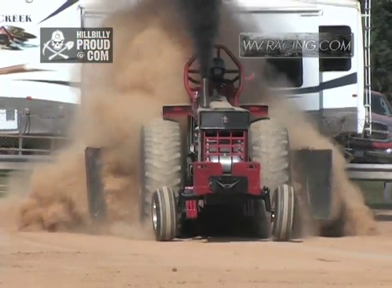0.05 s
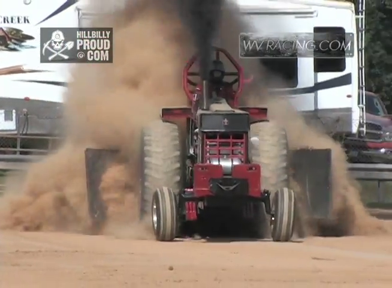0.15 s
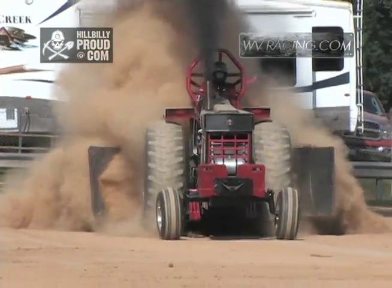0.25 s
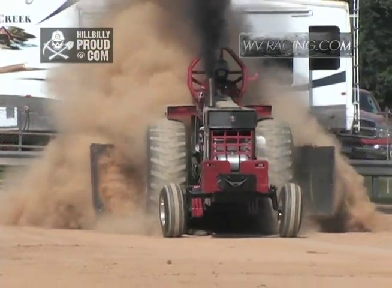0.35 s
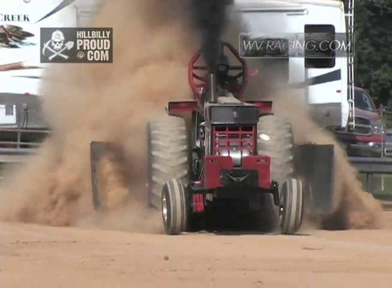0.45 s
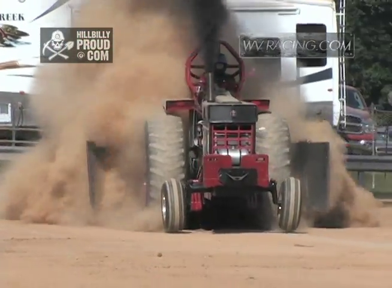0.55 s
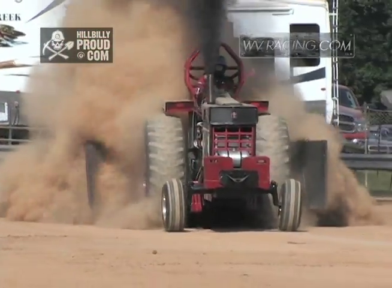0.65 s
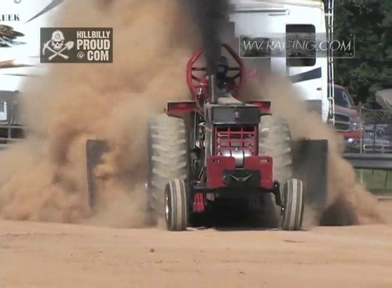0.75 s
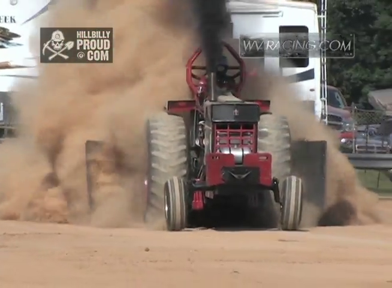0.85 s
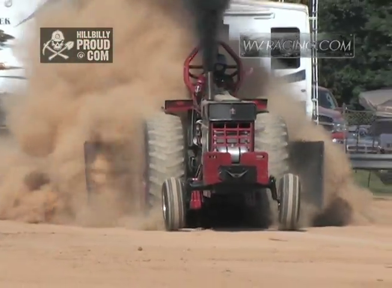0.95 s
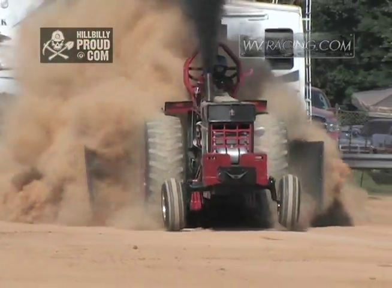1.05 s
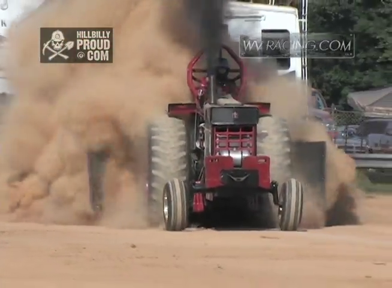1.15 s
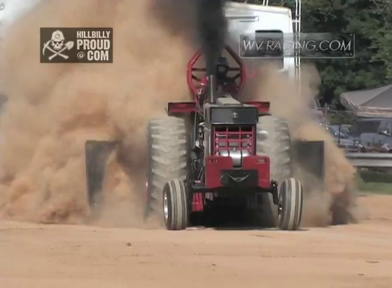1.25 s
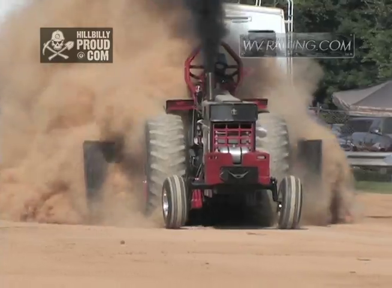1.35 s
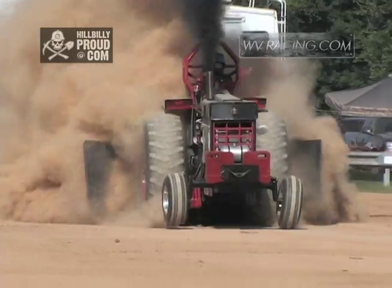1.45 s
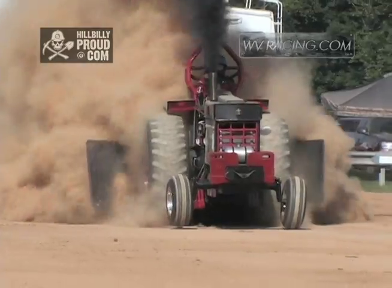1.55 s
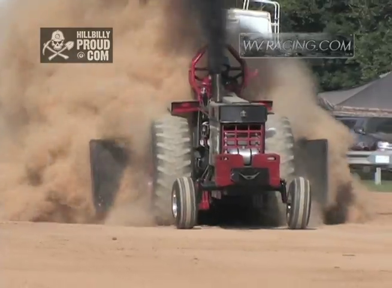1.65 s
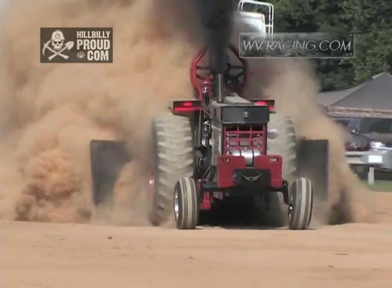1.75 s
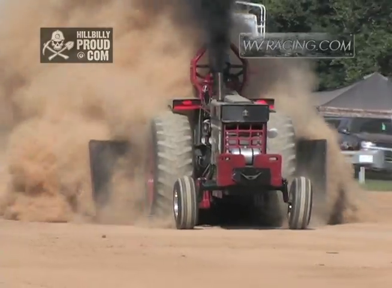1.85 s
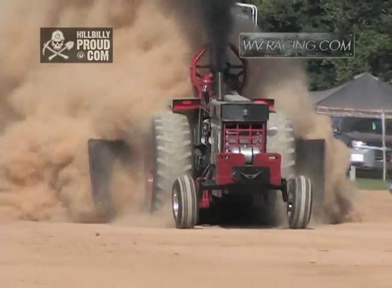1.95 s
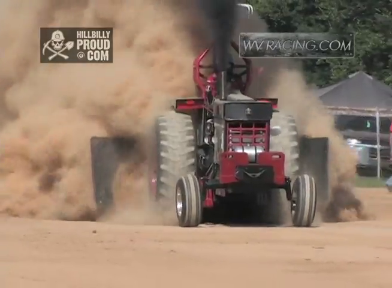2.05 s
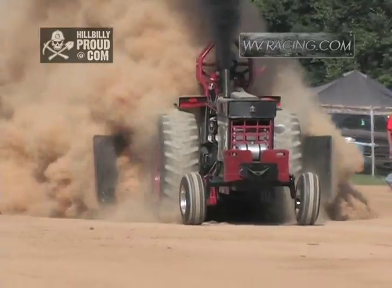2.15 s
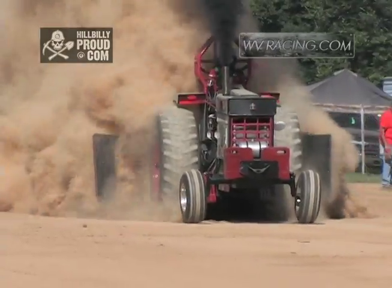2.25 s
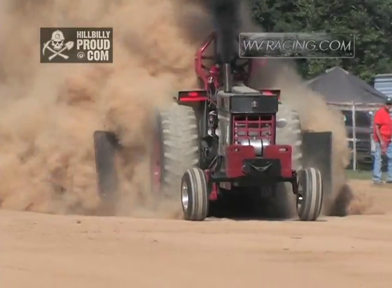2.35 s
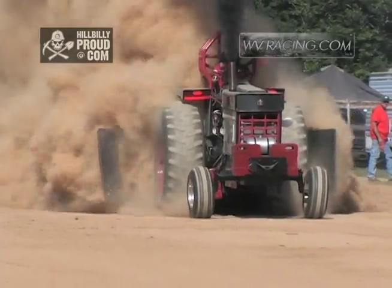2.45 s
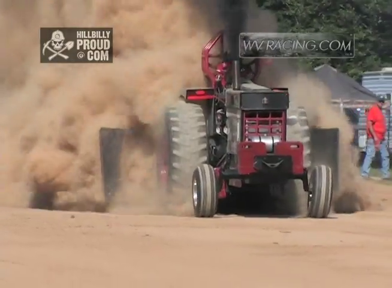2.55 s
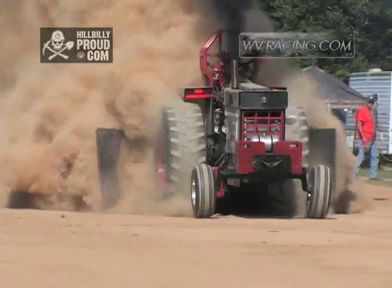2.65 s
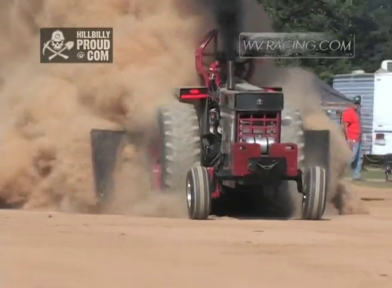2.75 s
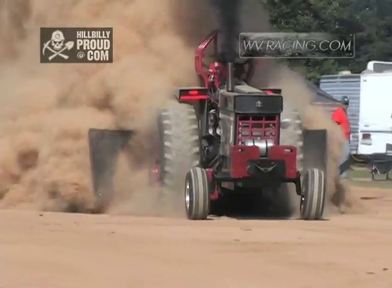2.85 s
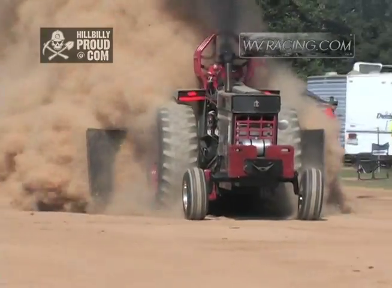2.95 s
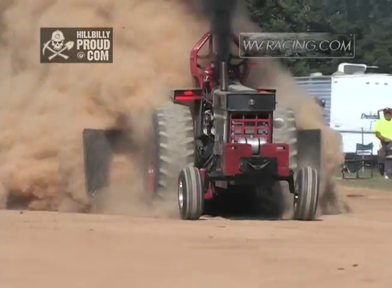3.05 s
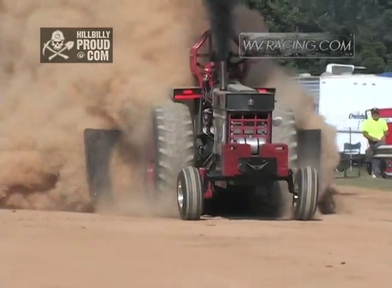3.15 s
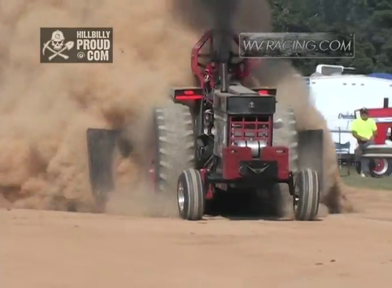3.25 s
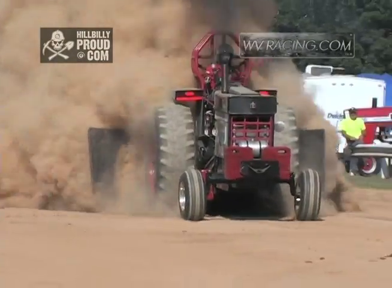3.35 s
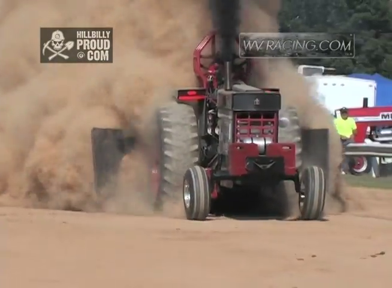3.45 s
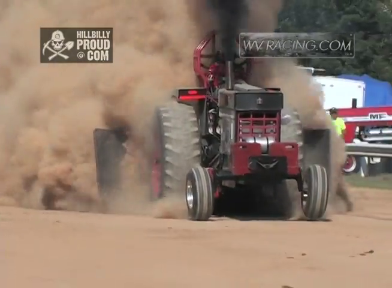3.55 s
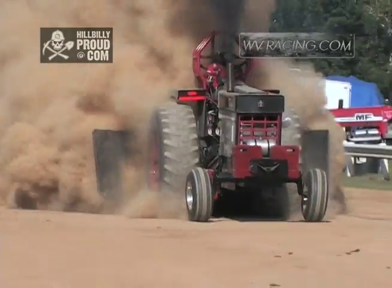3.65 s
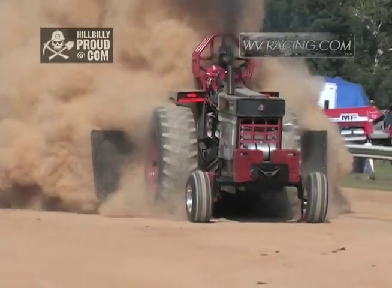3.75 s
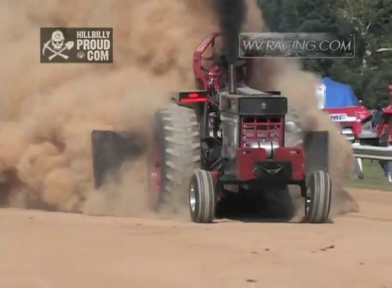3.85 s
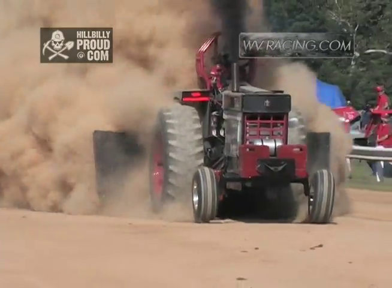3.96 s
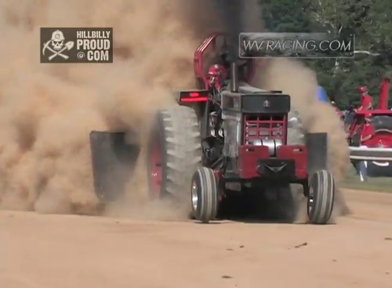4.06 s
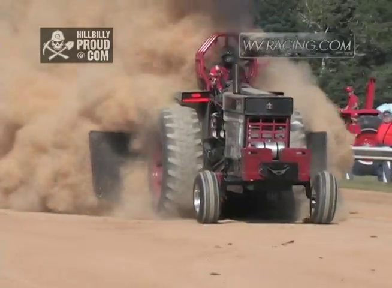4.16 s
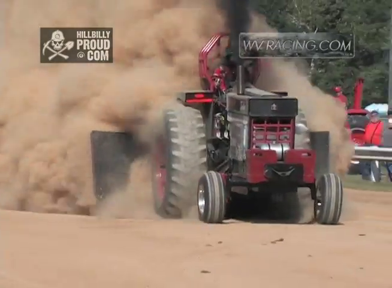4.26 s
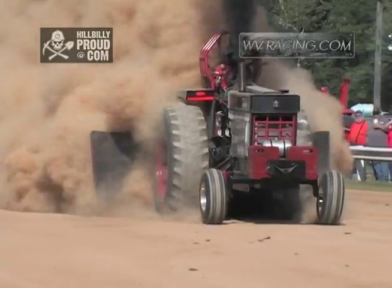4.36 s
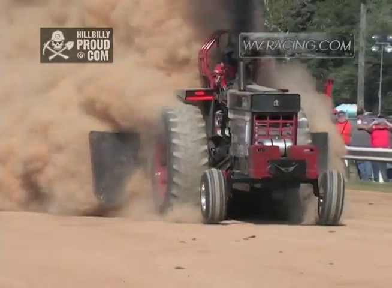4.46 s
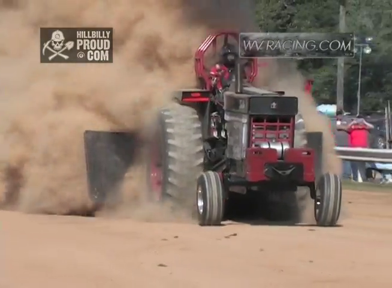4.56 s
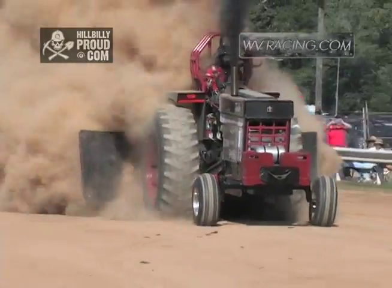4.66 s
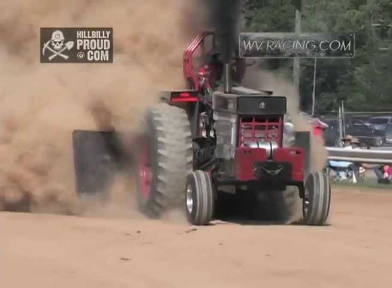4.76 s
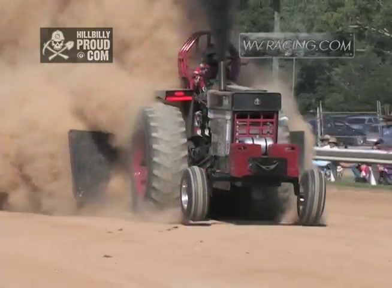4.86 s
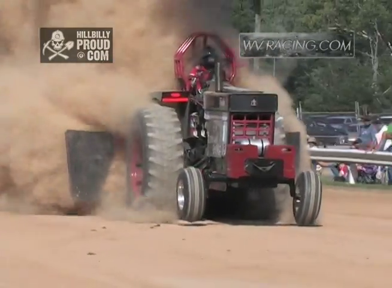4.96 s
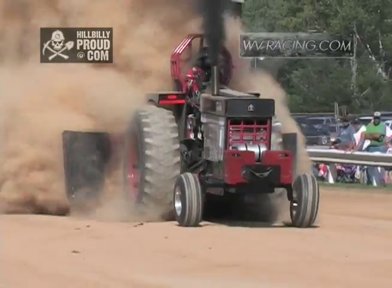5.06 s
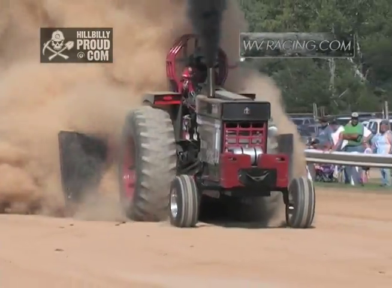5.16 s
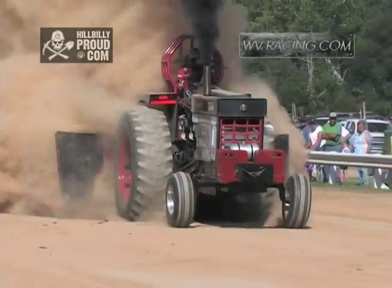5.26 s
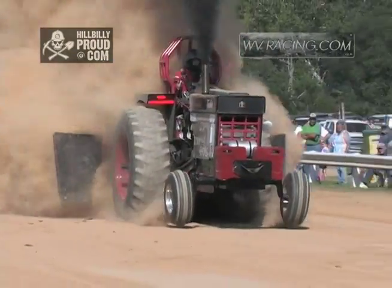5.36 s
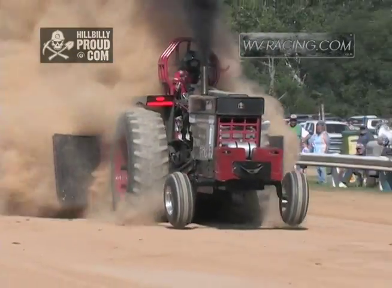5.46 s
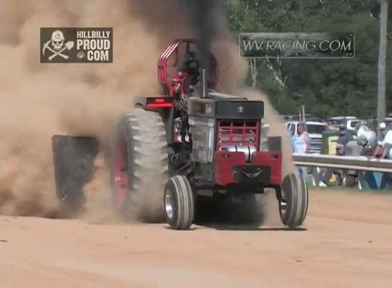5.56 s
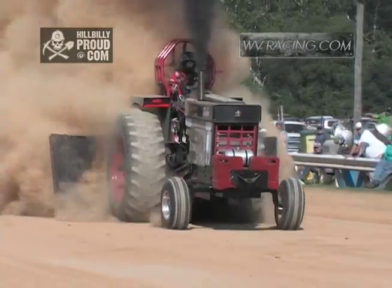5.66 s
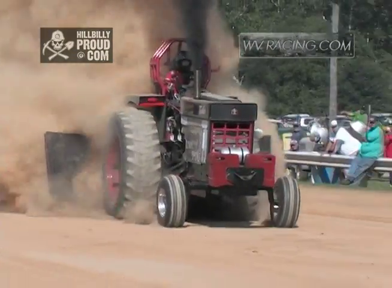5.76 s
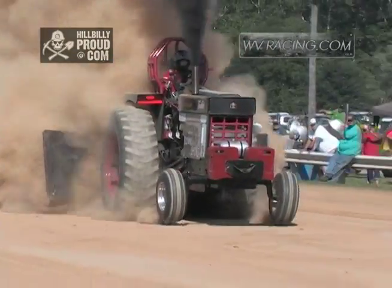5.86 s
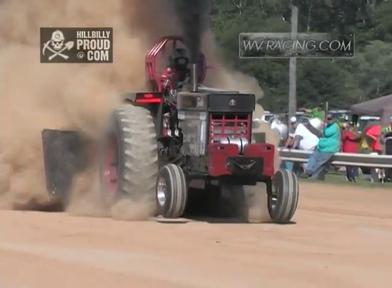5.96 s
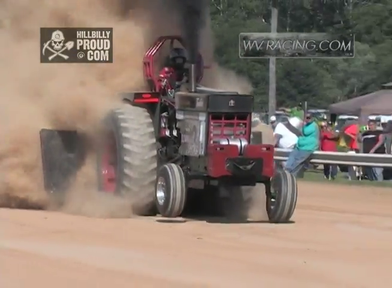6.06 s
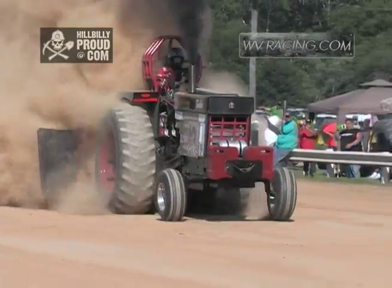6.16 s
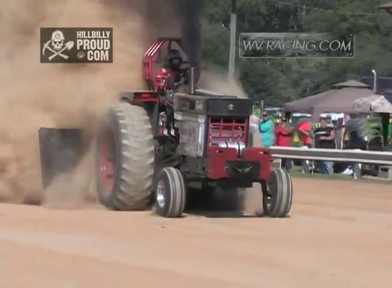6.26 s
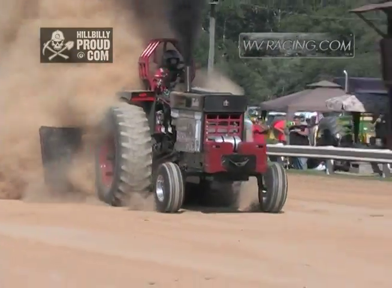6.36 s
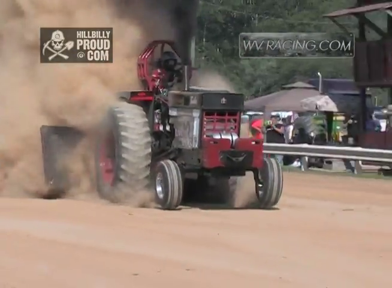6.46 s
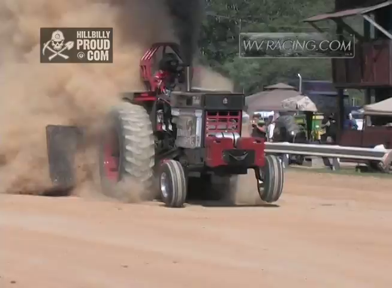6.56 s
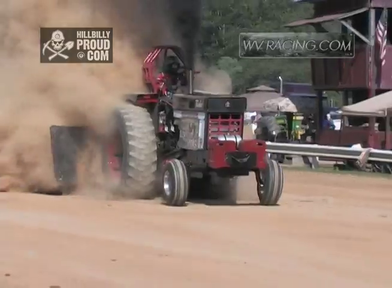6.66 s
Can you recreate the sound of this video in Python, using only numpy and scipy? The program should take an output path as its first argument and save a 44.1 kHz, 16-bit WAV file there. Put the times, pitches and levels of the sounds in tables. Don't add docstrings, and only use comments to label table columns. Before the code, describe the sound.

A boosted diesel pulling tractor drones at full throttle, its pitch lurching with wheel hops, growing into a loud hissing roar as it approaches.

```python
import sys
import numpy as np
from scipy import signal
from scipy.fft import rfft, irfft, next_fast_len
from scipy.io import wavfile
from scipy.ndimage import uniform_filter1d, map_coordinates

SR = 44100
rng = np.random.default_rng(int(sys.argv[2]) if len(sys.argv) > 2 else 0)


def file_out(sig):
    cols = np.atleast_2d(sig).T
    lim = np.clip(cols, -1, 1)
    pcm = np.round(lim * 32767).astype(np.int16)
    wavfile.write(sys.argv[1], SR, pcm)


def invert_db(x):
    u = np.asarray(x, float) / 20
    return 10 ** u


N = 295911
TIME = np.arange(N) / SR
CRUISE_HZ = 140


def curves(table):
    s, *columns = np.transpose(table)
    return [np.interp(TIME, s, c) for c in columns]


def unit(x):
    return x / np.sqrt(np.mean(x ** 2))


def noise():
    return rng.standard_normal(N)


def butter(x, order, hz, kind="low"):
    return signal.sosfilt(signal.butter(order, hz, kind, fs=SR, output="sos"), x)


def butter_in_phase(x, order, hz, kind="low"):
    return signal.sosfiltfilt(signal.butter(order, hz, kind, fs=SR, output="sos"), x)


def colour(x, spectrum):
    hz, db = np.transpose(spectrum)
    size = next_fast_len(N)
    log_hz = np.log(np.arange(1, size // 2 + 2) * SR / size)
    gain = invert_db(np.interp(log_hz, np.log(hz), db, -120, -120))
    return unit(irfft(rfft(x, size) * gain, size)[:N])


def walk(rate_hz):
    hold = int(SR / rate_hz)
    steps = np.repeat(rng.standard_normal(N // 50), hold)[:N]
    return unit(uniform_filter1d(uniform_filter1d(steps, hold), hold))


def ring(x, hz, width_hz):
    return signal.lfilter(*signal.iirpeak(hz, hz / width_hz, fs=SR), x)


def bell(s, half_s):
    return np.exp(-((TIME - s) / half_s) ** 2)


def lag(x, time_s):
    return signal.lfilter([1 / (time_s * SR)], [1, -np.exp(-1 / (time_s * SR))], x)


# frequency in Hz, density in dB per Hz.
RUMBLE_SPECTRUM = [(20, -40), (32, -31), (50, -11), (62, 4.5), (75, -3), (98, -17), (170, -4), (245, -0.5),
                   (310, -5), (420, -3)]


def rumble():
    return invert_db(-42.5 + 0.87 * walk(6.1)) * colour(noise(), RUMBLE_SPECTRUM)


# crest of speed in seconds, firing rate there in Hz, fall to the bog in seconds,
# firing rate in the bog in Hz.
WHEEL_HOPS = [(0.06, 145.2, 0.186, 119.0), (0.509, 146.9, 0.203, 125.4), (0.968, 147.2, 0.209, 123.5),
              (1.407, 147.6, 0.216, 123.8), (1.862, 144.6, 0.203, 127.9), (2.287, 143.7, 0.217, 131.4),
              (2.723, 143.8, 0.201, 131.9), (3.149, 149.6, 0.179, 135.2), (3.528, 150.8, 0.177, 136.0),
              (3.913, 149.7, 0.167, 137.9), (4.324, 148.4, 0.208, 137.7), (4.719, 151.2, 0.213, 137.4),
              (5.16, 152.8, 0.115, 135.9), (5.503, 143.3, 0.613, 138.7), (6.29, 142.8, 0.27, 134.1),
              (6.761, 137.8, 0.268, 126.0)]
BOG_LOSS_DB = [4, 4.5, 2, -2, 2.5, 1.5, -0.5, 1, 0, -2, -1, 0.5, 3, 1, -0.5, 0]


def speed(climb_bend=1.09, fall_bend=.79, bog_s=0.083):
    top_s, top_hz, fall_s, bog_hz = np.transpose(WHEEL_HOPS)
    knot_s = np.ravel([top_s, top_s + fall_s], "F")
    knot_hz = np.ravel([top_hz, bog_hz], "F")
    index = np.arange(len(knot_s))
    place = np.interp(TIME, knot_s, index)
    k = place.astype(int)
    part = (place - k) ** np.where(k % 2, climb_bend, fall_bend)
    firing_hz = np.interp(k + (1 - np.cos(np.pi * part)) / 2, index, knot_hz)
    bog_db = sum(db * bell(s, bog_s) for s, db in zip(top_s + fall_s, BOG_LOSS_DB))
    return firing_hz, bog_db


# centre in seconds, half length in seconds, turbo sag in Hz.
FUEL_CUTS = [(0.117, 0.029, 205), (0.575, 0.038, 287), (1.031, 0.044, 295), (1.49, 0.058, 355),
             (1.915, 0.015, 55), (2.397, 0.114, 58), (2.825, 0.13, 100), (3.213, 0.048, 738),
             (3.582, 0.043, 1573), (3.971, 0.051, 1502), (4.371, 0.051, 1276), (4.781, 0.039, 1656),
             (5.189, 0.031, 1513)]
# gas loss in dB, misfire loss of the boom in dB.
CUT_LOSSES = [(4, 2), (4, -0.5), (2.5, 0.5), (2.5, 1.5), (1, 2), (2, 1), (1.5, 0), (5, 1.5), (11, 5),
              (8.5, 5), (8, 3), (10.5, 7.5), (10.5, 9)]


def governor(starve_lag_s=0.0051, spool_s=.207):
    starved = np.array([bell(s + starve_lag_s, half_s) for s, half_s, _ in FUEL_CUTS])
    gas_loss_db, misfire_db = np.transpose(CUT_LOSSES) @ starved
    brake = sum(hz * spool_s * bell(s, half_s) / (half_s * np.sqrt(np.pi)) for s, half_s, hz in FUEL_CUTS)
    return gas_loss_db, misfire_db, lag(brake, spool_s)


# time in seconds, level in dB.
GEAR_LEVEL = [(0, -60), (3.5, -50), (4.1, -39), (4.95, -35), (5.5, -38), (5.7, -42), (6.1, -35), (6.4, -38),
              (6.71, -41)]


def gear(turns, firing_hz, case_hz=673, width_hz=13, flutter_db=3.0):
    order = 29 / 6
    resonance = (1 + ((order * firing_hz - case_hz) / width_hz) ** 4) ** -.5
    level = invert_db(curves(GEAR_LEVEL)[0] + flutter_db * walk(20))
    return np.sqrt(2) * level * resonance * np.cos(2 * np.pi * order * turns)


# time in seconds, centre in Hz, level in dB.
BOOST_SURGES = [
    (3.66, 3200, -39),
    (4.04, 3540, -31),
    (4.43, 3460, -34),
    (4.841, 3397, -33),
    (5.25, 3330, -35),
]


def surge(length_s=.035, glide_hz=400, width_hz=450):
    hiss = unit(butter(noise(), 2, width_hz))
    carrier = 0
    for s, hz, db in BOOST_SURGES:
        age = (TIME - s) / length_s
        phase = 2 * np.pi * np.cumsum(hz + glide_hz * np.tanh(age)) / SR
        carrier = carrier + invert_db(db) * np.exp(-age ** 2) * np.sin(phase)
    return np.sqrt(2) * hiss * carrier


# knock in dB, knock lag in firings, boom in dB, puff in dB.
CYLINDER_TRAITS = [(-0.5, -.1, 1, -1.5), (-3.5, -.7, 2, -0.9), (-2, -.05, 2, 0.1), (-5.5, 0.07, 1, 0.1),
                   (-0.5, 0.02, 1, -0.8), (-6.5, 0.1, -0.5, 0.45)]
# frequency in Hz, width in Hz, level in dB.
BLOCK_MODES = [(354, 7.5, -17), (551, 53, 3.5), (667, 49, 0.5), (756, 37, -2.5), (897, 100, -2.5)]
# frequency in Hz, density in dB per Hz.
SLED_SPECTRUM = [(130, 2), (215, -8), (302, -24), (381, -4.5), (443, -8), (500, -3), (670, -6), (809, -8.5),
                 (1050, -11.5), (1210, -33), (1300, -17), (1690, -59), (2860, -120)]


def clatter(turns, scatter_db=1.5, jitter=.015, noise_db=(5, -3.5), step_db=-6):
    at = np.flatnonzero(np.diff(np.floor(turns - .3))) + 1
    late, strong = rng.standard_normal((2, len(at)))
    knock_db, lag_firings = np.array(CYLINDER_TRAITS)[np.floor(turns[at] - .1).astype(int) % 6, :2].T
    delay = ((lag_firings + jitter * late) * SR / CRUISE_HZ).astype(int)
    knocks = np.zeros(N)
    knocks[np.clip(at + delay, 0, N - 1)] = -invert_db(knock_db + scatter_db * strong)
    knocks = butter(knocks, 4, 1100)
    block = 0
    for k, (hz, width_hz, db) in enumerate(BLOCK_MODES):
        block = block + (-1) ** k * invert_db(db) * ring(knocks, hz, width_hz) * (hz / width_hz) ** .5
    drop = butter(signal.lfilter([1], [1, -.985], knocks), 2, 190, "high")
    block = unit(block) + invert_db(step_db) * unit(drop)
    share = invert_db(np.linspace(*noise_db, N))
    sled = share * invert_db(0.37 * walk(28)) * colour(noise(), SLED_SPECTRUM)
    return (unit(block) + sled) / np.sqrt(1 + share ** 2)


# time in seconds, frequency in Hz.
BLADE_TONE = [(0, 12501), (2, 12740), (3, 12814), (4, 12734), (5.3, 12626), (5.7, 12644), (6, 12598),
              (6.3, 12748), (6.71, 12754)]
# time in seconds, level in dB.
WHISTLE_LEVEL = [(0, -72), (.15, -52.5), (.72, -53), (.89, -62), (1.2, -49), (1.66, -54), (1.83, -58),
                 (2.3, -51), (2.55, -58), (2.75, -41), (3.5, -48), (4.25, -38.5), (5.0, -37.5), (5.2, -33),
                 (5.6, -44), (5.85, -30), (6.33, -38.5), (6.71, -46)]
# offset from the blade tone in Hz, level in dB.
SHAFT_TONES = [
    (-340, -15),
    (332, -24),
]


def turbo(turns, firing_hz, sag_hz, wander_hz=10, shake=.3):
    follow_s, tone_per_firing = .06, 14.2
    hz = curves(BLADE_TONE)[0] - sag_hz + tone_per_firing * lag(firing_hz - CRUISE_HZ, follow_s)
    level_db = curves(WHISTLE_LEVEL)[0] + 4 * sag_hz / 1000
    phase = 2 * np.pi * np.cumsum(hz + wander_hz * walk(100)) / SR + shake * np.sin(2 * np.pi * turns)
    tone = np.sin(phase)
    for offset_hz, db in SHAFT_TONES:
        tone = tone + invert_db(db + 1.5 * walk(15)) * np.sin(phase + 2 * np.pi * offset_hz * TIME)
    swirl = unit(butter(noise(), 2, 450))
    tone = tone + invert_db(-17) * swirl * np.cos(phase)
    return np.sqrt(2) * invert_db(level_db + 2.6 * walk(60)) * tone


def inlet(jet, sag_hz, band_hz=(11800, 13400), db_per_khz=14):
    top = butter_in_phase(jet, 4, band_hz, "band")
    return jet - (1 - invert_db(-db_per_khz * sag_hz / 1000)) * top


# time in seconds, notch spacing in Hz, echo share 0-1.
GROUND_ECHO = [(0, 10000, 0.078), (2.0, 9300, 0.12), (2.7, 10700, 0.22), (3.2, 7360, 0.16),
               (3.5, 5960, 0.37), (3.85, 4947, 0.42), (4.4, 4230, 0.56), (4.9, 4040, 0.65),
               (5.4, 3650, 0.43), (6.0, 3290, 0.49), (6.71, 2702, 0.24)]


def ground(x, dull_hz=8000):
    notch_hz, share = curves(GROUND_ECHO)
    dull = butter_in_phase(x, 1, dull_hz)
    echo = map_coordinates(dull, [np.arange(N) - SR / notch_hz], order=3, mode="nearest")
    return (x - share * echo) / np.sqrt(1 + share ** 2)


def puffs(turns, depth_db, scatter_db):
    firing = turns.astype(int)
    puff_db = np.array(CYLINDER_TRAITS)[firing % 6, 3] + scatter_db * noise()[firing]
    puff_db = uniform_filter1d(puff_db, size=120)
    return unit(invert_db(puff_db - depth_db * np.cos(2 * np.pi * (turns - .07))))


# frequency in Hz, density in dB per Hz.
JET_SPECTRUM = [(1900, -21), (2400, -10), (2860, -5.5), (3300, -1), (4400, -1.5), (5800, 1), (6500, 0),
                (7200, 2), (9000, -3), (11000, -8.5), (11800, -15.5), (12600, -8), (13300, -28),
                (15900, -31)]
# frequency in Hz, density in dB per Hz.
RASP_SPECTRUM = [(680, -27), (1150, -1), (1240, -18), (1400, -2), (1760, 4.5), (2330, -1.5), (2800, -15.5),
                 (3640, -3), (6160, -120)]
# time in seconds, shrill edge against the roar in dB.
HAZE_EDGE = [(0, -20), (.3, -34), (.47, -21), (.92, -10.5), (1.06, -16), (1.42, -9.5), (1.5, -30),
             (1.95, -33), (2.45, -15.5), (2.86, -5.5), (3.2, -11), (3.38, -4), (4.5, -3), (5.0, -3.5),
             (5.7, -5.5), (6.1, -7.5), (6.71, -5.5)]


def gas(turns, roar_db, rasp_db, sag_hz, split_hz=8300):
    edge_db = curves(HAZE_EDGE)[0] - 0.5 * sag_hz / 1000
    jet = colour(puffs(turns, depth_db=1.96, scatter_db=0.77) * noise(), JET_SPECTRUM)
    low = butter_in_phase(jet, 2, split_hz)
    roar = unit(low) * invert_db(0.82 * walk(10))
    edge = unit(jet - low) * invert_db(edge_db + 0.27 * walk(14))
    rasp = colour(puffs(turns, depth_db=2.0, scatter_db=0.4) * noise(), RASP_SPECTRUM)
    return invert_db(roar_db) * (roar + edge), invert_db(rasp_db + 0.44 * walk(12)) * rasp


# multiple of the firing rate, level far in dB, level near in dB.
BOOM_OVERTONES = [
    (1.5, -29, -24),
    (2, -20, -29),
]


def boom(turns, boom_db):
    cylinder_db = uniform_filter1d(np.array(CYLINDER_TRAITS)[turns.astype(int) % 6, 2], size=300)
    tone = np.cos(2 * np.pi * turns)
    for multiple, far_db, near_db in BOOM_OVERTONES:
        tone = tone + invert_db(np.linspace(far_db, near_db, N)) * np.cos(2 * np.pi * multiple * turns + 1)
    return np.sqrt(2) * invert_db(boom_db + cylinder_db + 0.98 * walk(30)) * tone


# time in seconds, nearness of the stack 0-1.
STACK_NEARNESS = [(0, 0), (1.4, .17), (2.3, 0.35), (2.8, 0.37), (3.5, 0.56), (4.2, 0.7), (4.7, 0.82),
                  (5.3, 1), (6.0, 0.94), (6.71, 0.87)]


def scene():
    firing_hz, bog_db = speed()
    gas_loss_db, misfire_db, sag_hz = governor()
    turns = np.cumsum(firing_hz) / SR
    near = curves(STACK_NEARNESS)[0]

    pipe_hz, pipe_width_hz = 144.7, 14.3
    pipe_db = -10 * np.log10(1 + ((firing_hz - pipe_hz) / pipe_width_hz) ** 2)
    boom_db = -26.5 + 6.5 * near + pipe_db - bog_db - misfire_db
    roar_db = -37.5 + 14.5 * near - gas_loss_db
    roar_db = roar_db - 2 * sag_hz / 1000 + 0.1061 * (firing_hz - CRUISE_HZ)
    rasp_db = np.linspace(-46.5, -30.5, N) - 0.71 * gas_loss_db
    clatter_db = np.linspace(-39.5, -26, N) - 0.98 * gas_loss_db * near

    mono = rumble() + gear(turns, firing_hz) + surge()
    mono = mono + invert_db(clatter_db) * clatter(turns)
    mono = mono + turbo(turns, firing_hz, sag_hz)
    jet, rasp = gas(turns, roar_db, rasp_db, sag_hz)
    mono = mono + ground(inlet(jet, sag_hz)) + rasp
    mono = mono + boom(turns, boom_db)
    return np.array([mono, mono])


def low_pass(x):
    return signal.sosfilt(signal.butter(12, 15750, fs=SR, output="sos"), x)


def record(dry):
    return low_pass(dry)


dry = scene()
out = record(dry)
file_out(out)
```